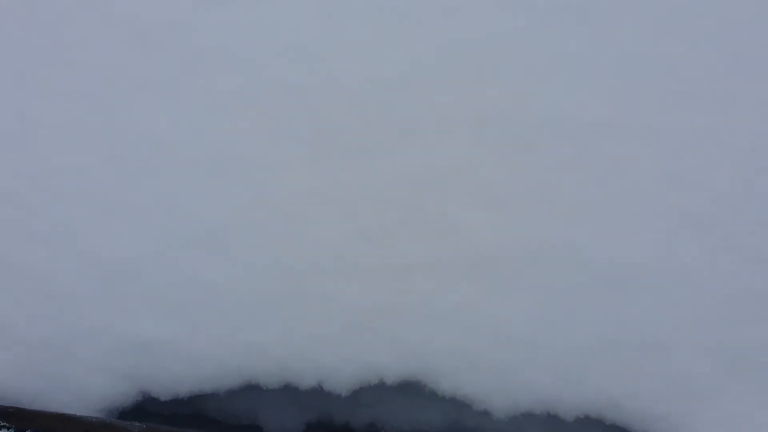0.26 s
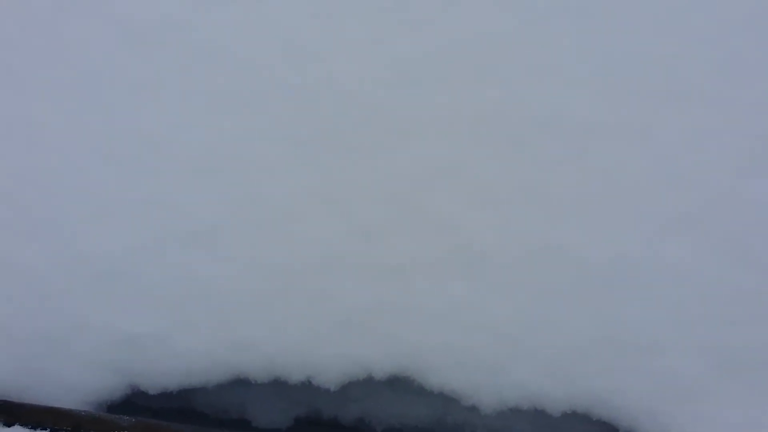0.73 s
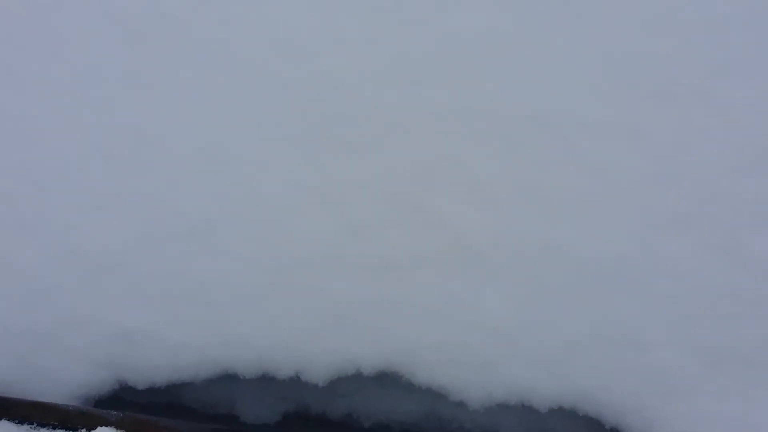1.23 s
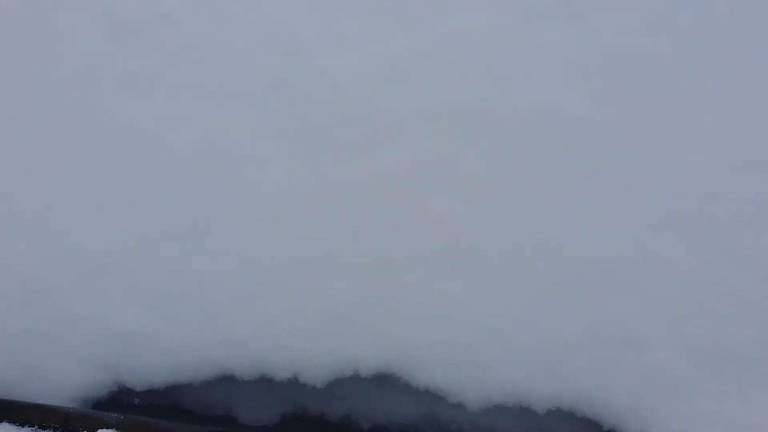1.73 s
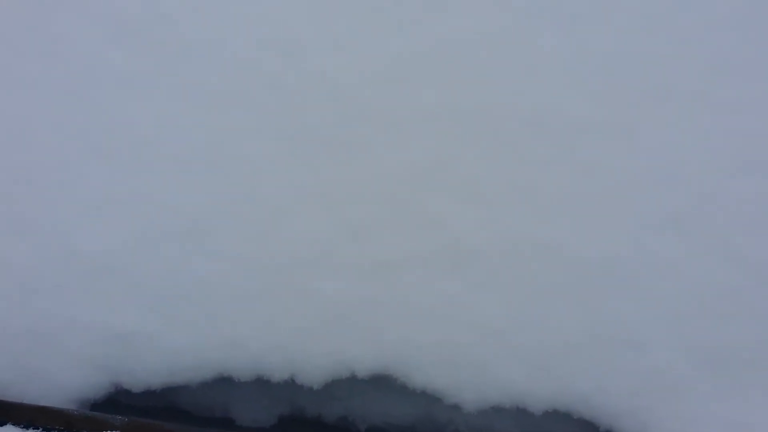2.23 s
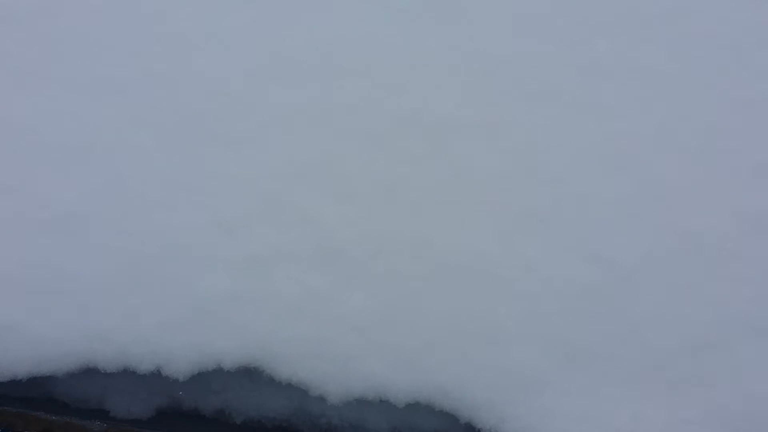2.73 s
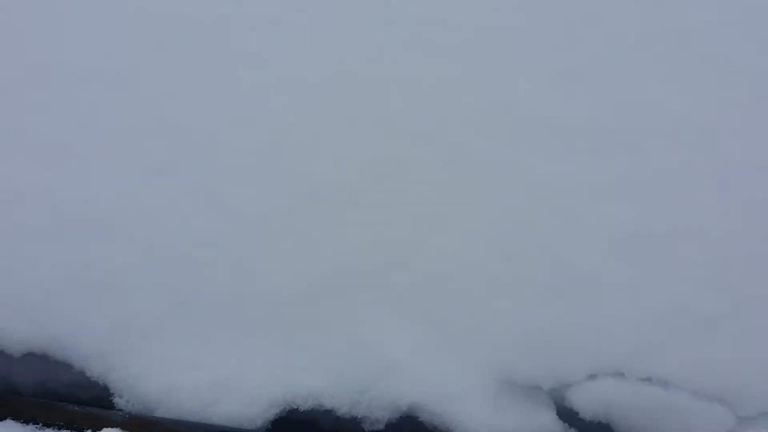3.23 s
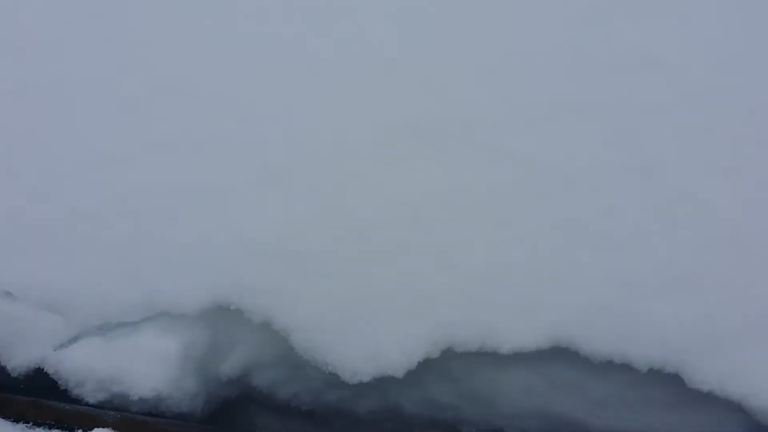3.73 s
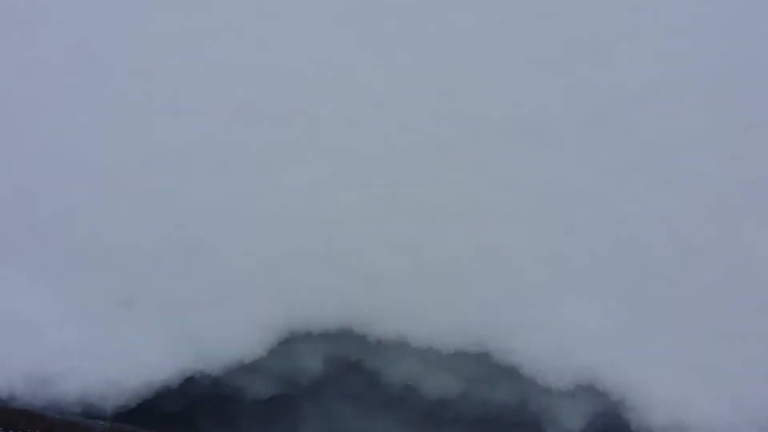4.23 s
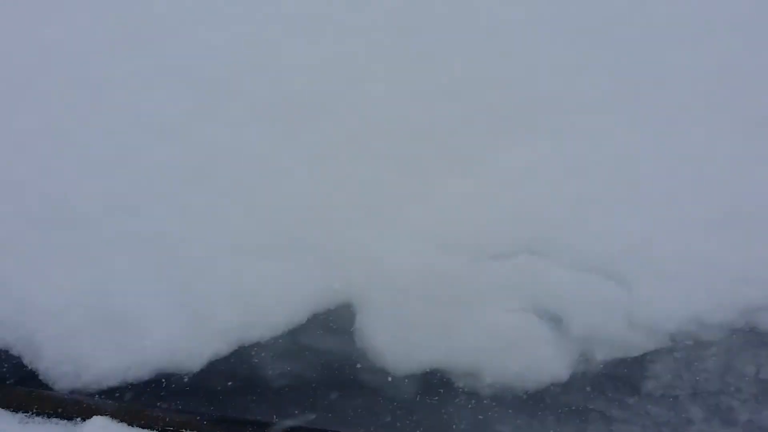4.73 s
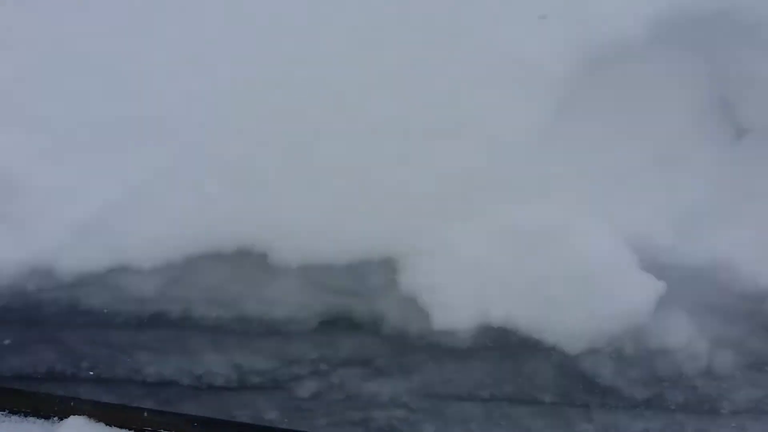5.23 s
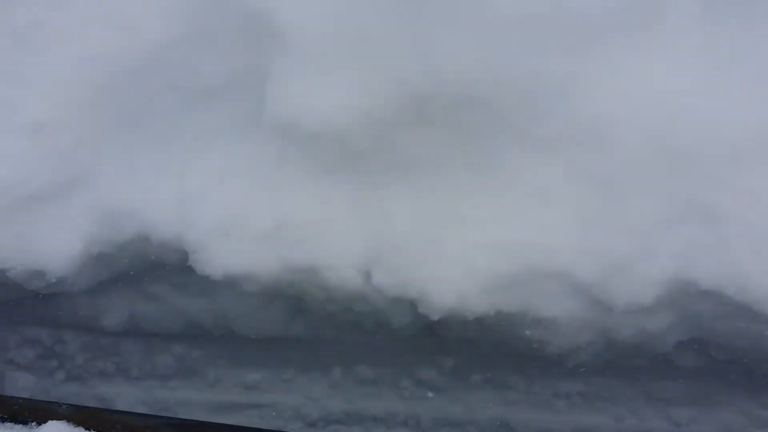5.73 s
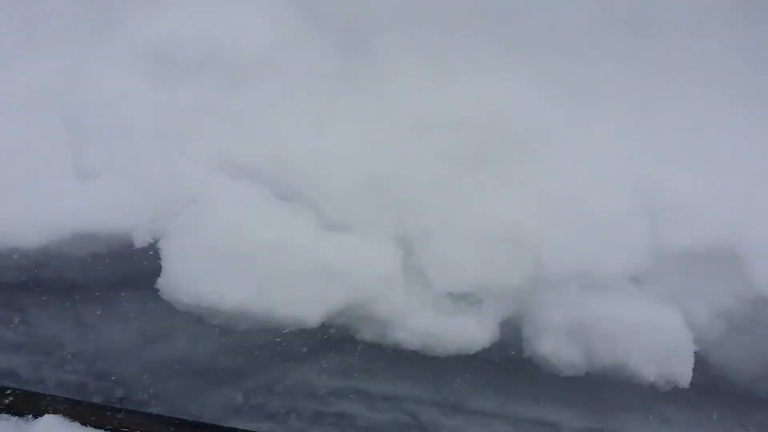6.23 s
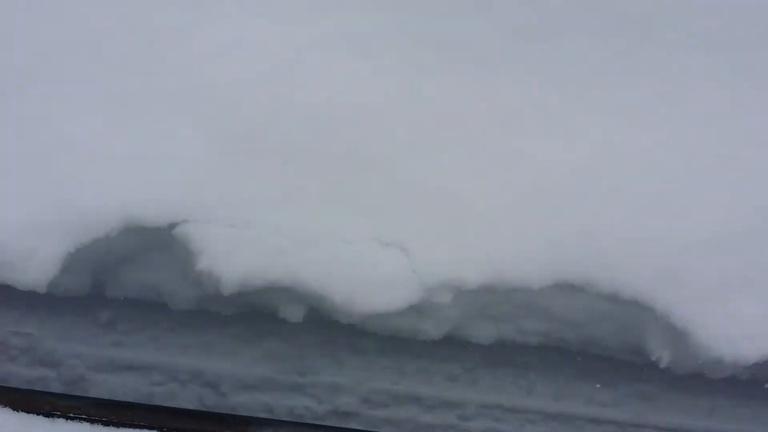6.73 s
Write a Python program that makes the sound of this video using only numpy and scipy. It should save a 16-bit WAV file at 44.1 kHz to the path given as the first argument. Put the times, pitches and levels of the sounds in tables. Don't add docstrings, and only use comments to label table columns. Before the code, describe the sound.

Inside a car in deep snow, a low V8 drone revs up, then a loud grinding, hammering drivetrain roar bursts in and subsides to crunching snow.

```python
import sys
import numpy as np
from scipy import signal
from scipy.fft import rfft, irfft, next_fast_len
from scipy.io import wavfile
from scipy.ndimage import uniform_filter1d

SR = 44100
rng = np.random.default_rng(int(sys.argv[2]) if len(sys.argv) > 2 else 0)


def volts_from_decibels(level):
    exponent = np.asarray(level, float) / 20
    return 10 ** exponent


def bounce(signal):
    frames = np.transpose(np.atleast_2d(signal))
    limited = np.clip(frames, -1, 1)
    pcm = np.round(limited * 32767).astype(np.int16)
    wavfile.write(sys.argv[1], SR, pcm)


N = 307818
TIME = np.arange(N) / SR
PAD = next_fast_len(N, True)
HZ = np.fft.rfftfreq(PAD, 1 / SR) + 1e-9


def level(x, db):
    return x * volts_from_decibels(db) / np.sqrt(np.mean(x ** 2))


def along(table, column):
    table = np.array(table, float)
    return np.interp(np.log(HZ), np.log(table[:, 0]), table[:, column])


def curves(table):
    times, *columns = np.transpose(table)
    return [np.interp(TIME, times, column) for column in columns]


def walk(rate):
    hold = int(SR / rate)
    steps = np.repeat(rng.standard_normal(N // hold + 1), hold)
    return 0.85 * uniform_filter1d(uniform_filter1d(steps, hold), hold)[:N]


def colour(x, response):
    return irfft(rfft(x, PAD) * response, PAD)[..., :N]


def resonance(hz, width):
    return 1j * HZ * width / (hz ** 2 - HZ ** 2 + 1j * HZ * width)


def ring(modes):
    response = 0
    for hz, width, db, delay in modes:
        response = response + volts_from_decibels(db) * resonance(hz, width) * np.exp(-2j * np.pi * HZ * delay)
    return response


def wash(table, flicker_db, flicker_rate):
    shaped = rfft(rng.standard_normal((2, PAD))) * volts_from_decibels(along(table, 1))
    low, high = table[0][0], table[-1][0]
    inside = (HZ > low) & (HZ < high)
    out = 0
    for octave in range(int(np.log2(low)) + 1, int(np.log2(high)) + 2):
        band = inside * np.clip(1 - np.abs(np.log2(HZ) - octave), 0, 1)
        out = out + volts_from_decibels(flicker_db * walk(flicker_rate)) * irfft(shaped * band, PAD)[:, :N]
    return level(out, 0)


def bursts(times, dbs, crack, rise, fall, grit_db):
    starts = np.zeros(N)
    starts[(np.array(times) * SR).astype(int)] = volts_from_decibels(np.array(dbs))
    t = TIME[:SR // 8]
    envelope = (1 - np.exp(-t / rise)) * np.exp(-(t / fall) ** 2)
    shape = signal.fftconvolve(starts, envelope)[:N]
    return crack * starts + shape * volts_from_decibels(grit_db * walk(700)) * rng.standard_normal((2, N))


# t/s, firing rate f/Hz, firing tone level/dB
REVS = [(0, 61.84, -42), (.76, 68.36, -30.5), (1.52, 68.2, -33.5), (1.88, 57.1, -41), (2.2, 61.7, -40),
        (2.66, 69.97, -28), (2.82, 95.7, -20), (3.03, 131, -39), (3.3, 141, -26.5), (3.9, 157.1, -28),
        (4.5, 182, -22.5), (4.7, 185.1, -20), (4.96, 147.3, -31), (5.23, 91.8, -35), (5.5, 66.36, -36),
        (5.68, 73.6, -28), (5.95, 78, -24), (6.98, 73.7, -33)]
# multiple of the firing rate, level/dB, unsteadiness/dB
ORDERS = [(.5, -22.5, 14.5), (1, 0, 1.5), (1.5, -25, 3), (2, -9, 3), (2.5, -13, 5), (3, -18, 7.5),
          (3.5, -13, 10), (4, -18, 2.5)]


def engine():
    firing_hz, tone_db = curves(REVS)
    phase = 2 * np.pi * np.cumsum(firing_hz) / SR
    tone = 0
    for multiple, db, sway_db in ORDERS:
        bulkhead = np.sqrt(1 + (multiple * firing_hz / 330) ** 8)
        size = volts_from_decibels(db + sway_db * walk(12)) / bulkhead
        tone = tone + size * np.sin(multiple * phase + 0.26 * sway_db * walk(9))
    return np.sqrt(2) * volts_from_decibels(tone_db) * tone, phase, firing_hz


# t/s, drivetrain load level/dB, wheel slip level/dB
DRIVE = [(0, -36, -60), (.6, -33.5, -59.5), (1.4, -31.5, -58), (1.9, -39, -62), (2.2, -36.5, -58.5),
         (2.45, -32.5, -56), (2.66, -33.5, -51), (2.78, -27, -41.5), (2.92, -18.5, -37.5),
         (3.15, -16.5, -38), (3.7, -20, -39), (4.43, -15.5, -36), (4.7, -15.5, -38.5), (5.05, -19.5, -52.5),
         (5.36, -33.5, -52), (5.9, -27.5, -51.5), (6.3, -27, -50.5), (6.98, -27.5, -50)]


def drivetrain(phase, firing_hz):
    load_db, slip_db = curves(DRIVE)
    throb = np.cos(phase)
    rolling = np.clip((TIME - 5.15) / 0.18, 0, 1)
    body = boom(load_db, throb) + roar(load_db, throb) + grind(load_db, slip_db, rolling, throb)
    return body + spray(slip_db) + mist(slip_db, firing_hz) + tread(rolling)


# f/Hz, level/dB per Hz
BOOM = [(40, -7), (55, -6), (75, -7.5), (113, -3), (165, -1.5), (210, -4.5), (260, -13), (330, -40)]
# t/s, lift of the boom level/dB
LURCHES = [
    (2.8, 13),
    (4.2, 7.5),
]


def boom(load_db, throb):
    rise_s, fall_s = 0.04, 0.28
    since = np.clip(TIME - np.array(LURCHES)[:, :1], 0, None)
    swell = (1 - np.exp(-since / rise_s)) * np.exp(-since / fall_s)
    lurch_db = np.array(LURCHES)[:, 1] @ swell
    boom_db = -33.5 + 0.62 * (load_db + 33) + lurch_db - 0.5 * walk(11)
    return volts_from_decibels(boom_db) * (1 + 0.41 * throb) * wash(BOOM, flicker_db=4.0, flicker_rate=1.9)


# f/Hz, level/dB per Hz
ROAR = [(150, -23), (200, -8), (240, 2.5), (300, 1), (370, -6), (440, -9.5), (530, -7), (700, -11),
        (900, -57)]


def roar(load_db, throb):
    roar_db = load_db - 3.0 + 1.14 * walk(12)
    return volts_from_decibels(roar_db) * (1 + 0.11 * throb) * wash(ROAR, flicker_db=2.3, flicker_rate=12)


# f/Hz, level/dB per Hz
GRIND = [(240, -27.5), (400, -1.5), (438, -7.5), (637, -9.5), (742, -7), (946, -8), (1310, -16),
         (1630, -15.5), (2150, -21.5), (2660, -24.5), (4500, -34.5), (5850, -37), (9900, -120)]


def grind(load_db, slip_db, rolling, throb):
    grind_db = -43.5 + 0.56 * (load_db + 33) + 0.37 * (slip_db + 59) + 2.5 * rolling
    return volts_from_decibels(grind_db) * (1 + 0.078 * throb) * wash(GRIND, flicker_db=2.2, flicker_rate=18)


# f/Hz, level/dB per Hz
SPRAY = [(1470, -12), (2500, -2.5), (2660, -8.5), (3330, -7), (5290, -9.5), (5700, -10.5), (8650, -3),
         (11000, -7), (13400, -10.5), (14600, -15), (15300, -63)]


def spray(slip_db):
    splatter_db = np.clip(0.12 * (slip_db + 59), 0.4, 3) * walk(70)
    return volts_from_decibels(slip_db + 0.5 + splatter_db) * wash(SPRAY, flicker_db=0.96, flicker_rate=16)


# f/Hz, level/dB per Hz
MIST = [(10500, -22), (12000, 0), (14300, 2), (15200, -34)]


def mist(slip_db, firing_hz):
    mist_db = -49 + 1.8 * (slip_db + 38) + 0.0643 * (firing_hz - 153)
    return volts_from_decibels(mist_db) * wash(MIST, flicker_db=5.0, flicker_rate=25)


# t/s, level/dB
ROLL = [(5.1, -36), (5.3, -32.5), (5.6, -38), (5.88, -33.5), (6.2, -26), (6.38, -40), (6.47, -25),
        (6.58, -40), (6.98, -33)]
# f/Hz, level/dB per Hz
TREAD = [(300, -1), (420, -5), (520, -4.5), (620, -8.5), (730, 0), (800, -13.5), (1000, -12), (1400, -21.5)]


def tread(rolling):
    roll_db = curves(ROLL)[0] - 1 + 3.8 * walk(9) - 40 * (1 - rolling)
    return volts_from_decibels(roll_db) * wash(TREAD, flicker_db=1.2, flicker_rate=20)


# t/s, treble rattle level/dB, floor thump level/dB
BLOWS = [(2.8624, -14.5, -12.5), (2.9076, -19.5, -10), (2.947, -15, -11.5), (2.989, -19, -14),
         (3.0313, -17, -10), (3.0835, -18, -12.5), (3.121, -20, -16), (3.1517, -26, -11.5),
         (3.2019, -18, -13), (3.255, -20.5, -11), (3.286, -20, -12.5), (3.3318, -21, -18.5),
         (3.382, -20.5, -16), (3.425, -22.5, -14.5), (3.8567, -26, -12.5), (3.911, -21, -12.5),
         (3.9566, -20.5, -19), (4.2595, -19.5, -13.5), (4.3275, -18.5, -12.5), (4.36, -23, -17.5),
         (4.406, -17.5, -14), (4.4479, -21.5, -13), (4.4873, -17, -10.5), (4.5437, -18.5, -13.5),
         (4.6181, -21, -17), (4.6958, -18, -13), (4.777, -18, -15), (4.842, -14, -11.5)]
# t/s, treble rattle level/dB
KNOCKS = [(2.7046, -33), (2.765, -30), (2.793, -29.5), (2.8433, -21.5), (3.5009, -27), (3.5542, -26),
          (3.6125, -24.5), (3.665, -27), (3.7147, -24.5), (3.7529, -26), (3.804, -26.5), (4.0072, -29),
          (4.0716, -30), (4.1204, -23), (4.151, -23), (4.1988, -24), (4.24, -23), (4.2934, -23),
          (4.574, -25), (4.6602, -35)]
# f/Hz, width/Hz, level/dB, delay/s
FLOOR = [(549.7, 73, 4.5, 0.00087), (803, 82, -0.5, 0.001904), (1148, 108, 0.5, 0.001974)]
# f/Hz, width/Hz, level/dB, delay/s
PANEL = [(1593, 236, 3.5, 0.0068), (2290, 200, -2, 0.0057), (3500, 250, -27, 0.001265)]


def blows():
    hard = [(s, rattle, thump, -20.5) for s, rattle, thump in BLOWS]
    light = [(s, db, db - 12, db - 26) for s, db in KNOCKS]
    s, rattle_db, floor_db, panel_db = np.transpose(hard + light)
    tilt_db = -6.6 * np.clip(np.log2(HZ / 9000), -0.1, 1)
    treble = volts_from_decibels(along(SPRAY, 1) + tilt_db) * (HZ > 2500)
    floor_response = ring(FLOOR) / (1 + (HZ / 2600) ** 4)
    rattling = bursts(s, rattle_db + 3.0, crack=0.1, rise=0.0015, fall=0.011, grit_db=3.0)
    thumping = bursts(s, floor_db + 10.5, crack=19.3, rise=0.0003, fall=0.012, grit_db=4.5)[1]
    shaking = bursts(s, panel_db + 9.0, crack=7.5, rise=0.0006, fall=0.013, grit_db=-2.5)
    floor = colour(thumping, floor_response) * np.array([[-1.5], [1]])
    return colour(rattling, treble) + floor + colour(shaking, ring(PANEL))


# t/s, level/dB, lift of the low, high and top mode groups/dB
CLINKS = [
    (0.218, -43.5, -2, 7, 3),
    (.8294, -54, -8, -8, -8),
    (3.859, -28.5, -6, 7, -6),
    (5.059, -22.5, -2, 9, -2),
    (5.1299, -35, -12, -14, -12),
    (5.1492, -29, -14, 2, 8),
    (5.4846, -46, -9, 12, 8),
    (5.5776, -30.5, -1.5, -12, -4),
    (5.664, -34, -3, -14, -8),
    (5.7182, -34.5, -2, -3, 7),
]
# f/Hz, level/dB, t60/s
KEYS = [
    [(8990, 2, 0.091)],
    [(3000, -25, 0.21), (6180, -5.5, 0.21), (7700, -6.5, 0.099)],
    [(11960, -8, 0.08)],
    [(13200, -8, .04), (14520, -9, .06)],
]


def keys():
    out = np.zeros(N + SR)
    t = TIME[:SR // 4]
    onset = 1 - np.exp(-t / 0.00029)
    gaps = np.diff([clink[0] for clink in CLINKS], prepend=-1)
    shares = np.where(gaps < 0.09, 0.48, 1)
    for (s, db, *lifts), share in zip(CLINKS, shares):
        for group, lift_db in zip(KEYS, [0] + lifts):
            for hz, mode_db, t60 in group:
                decay = volts_from_decibels(db + mode_db + lift_db - 60 * t / (share * t60))
                out[int(s * SR):][:len(t)] += np.sin(2 * np.pi * hz * t) * decay * onset
    return out[:N]


# t/s, level/dB, length/s, centre f/Hz, left minus right/dB
SCUFFS = [(0.067, -34, 0.0099, 1680, -12), (.07, -39, 0.014, 5560, 2), (0.073, -25, 0.018, 680, -0.5),
          (.52, -47, .0094, 3500, 6), (.672, -52, .007, 6000, 10), (1.124, -36.5, 0.027, 8500, 13),
          (1.127, -35.5, 0.019, 4230, 5), (1.128, -32, .019, 1190, 0), (1.133, -29.5, 0.034, 450, 5),
          (1.412, -47, .013, 4530, 8), (1.791, -46, .0085, 8000, .1), (1.82, -51, .008, 9000, -3),
          (2.282, -49, .0068, 3500, -3), (2.368, -48, 0.0055, 2980, 11), (5.275, -51, 0.1, 3055, 25.5),
          (5.283, -54, 0.069, 6000, 18), (6.437, -53, .008, 10960, 4), (6.846, -20, 0.017, 147, 19.5),
          (6.922, -30, 0.0089, 9950, 3)]
# t/s, level/dB, length/s, centre f/Hz, left minus right/dB
BUMPS = [
    (.075, -21, 0.025, 165, 5.5),
    (0.085, -20.5, 0.015, 332, -12),
    (1.884, -22, .031, 90, -13),
    (1.928, -52, 0.018, 2900, 7),
    (6.722, -46.5, 0.16, 3174, 5),
    (.521, -48.5, .009, 6180, 9),
]


def scuffs():
    out = np.zeros((2, N + SR))
    rows = [(*row, 0.82) for row in SCUFFS] + [(*row, 0.26) for row in BUMPS]
    for s, db, length, hz, pan_db, share in rows:
        half = share * hz / 2
        middle = np.hypot(hz, half)
        edges = np.clip([middle - half, middle + half], 30, 18000)
        band = signal.butter(2, edges, "band", fs=SR, output="sos")
        t = TIME[:SR // 4] / length
        rub = signal.sosfilt(band, rng.standard_normal((2, len(t))))
        shape = np.clip(3.0 * t, 0, 1) * np.exp(-t ** 3)
        out[:, int(s * SR):][:, :len(t)] += level(rub, db) * shape * volts_from_decibels(np.array([[pan_db], [0]]))
    return out[:, :N]


# f/Hz, width/Hz, lift level/dB
CABIN = [(91.7, 6.5, 4), (162, 8.8, 3), (292, 11.8, 0.5), (352, 31, 3), (553, 21, -7), (1500, 138, 5.5),
         (2900, 79, 2), (8500, 760, 3)]
# f/Hz, left minus right/dB, likeness 0-1, left phase lead/rad
PORTS = [(50, -2, 1, -0.31), (250, -4, 0.89, 0.21), (600, -2.5, 0.67, 0.23), (825, -5, 0.26, 0.39),
         (1090, 1, 0.67, 0.74), (1460, 3, 0.7, 1.17), (2200, -4.5, 0.82, 0.72), (2900, -4, 0.55, -0.44),
         (4150, -10, 0.1, -1.3), (6500, -4, 0, 1.1), (7150, -6, 0.1, 0.19), (8500, -70, 0, 0),
         (14000, -56, 0.13, 0)]


def ports(direct, diffuse):
    like = np.clip(along(PORTS, 2), 0, 1)
    cabin = 1 + sum((volts_from_decibels(db) - 1) * resonance(hz, width) for hz, width, db in CABIN)
    other, right = colour(diffuse, cabin)
    side = volts_from_decibels(along(PORTS, 1)) * np.exp(1j * along(PORTS, 3))
    shared = colour(right, like * side)
    unshared = colour(other, np.sqrt(1 - like ** 2) * side)
    left = shared + unshared + colour(direct, side)
    return np.array([np.roll(left, 24), right + direct])


def scene():
    tone, phase, firing_hz = engine()
    diffuse = volts_from_decibels(3.0) * (drivetrain(phase, firing_hz) + blows()) + scuffs()
    return ports(volts_from_decibels(1.5) * tone + keys(), diffuse)


# f/Hz, level/dB per Hz
HISS = [(1000, 7), (4000, -7), (9000, -4.5), (15000, -44)]


def self_noise():
    return volts_from_decibels(-54.5) * wash(HISS, flicker_db=2.5, flicker_rate=8)


def band_limit(x):
    return signal.sosfilt(signal.butter(12, 15410, fs=SR, output="sos"), x)


def record(dry):
    noisy = dry + self_noise()
    rounded = noisy / (1 + (np.abs(noisy) / 1.05) ** 4) ** (1 / 4)
    bass_cut = 1 / np.sqrt(1 + (58 / HZ) ** 8)
    top_cut = 1 / np.sqrt(1 + (HZ / 14750) ** 110)
    mix = colour(rounded, bass_cut * top_cut)
    return band_limit(mix)


dry = scene()
out = record(dry)
bounce(out)
```